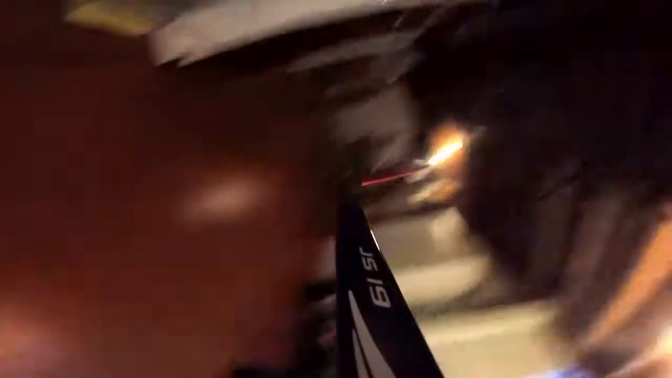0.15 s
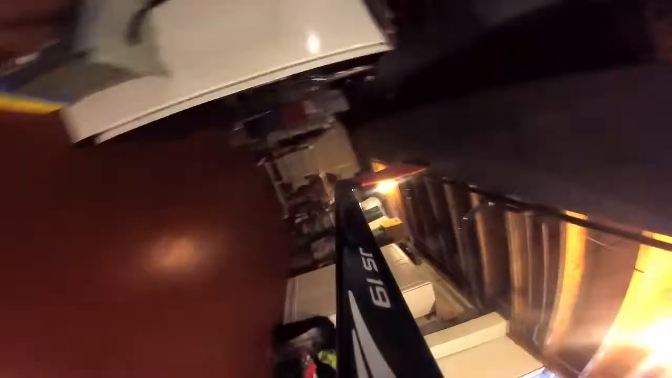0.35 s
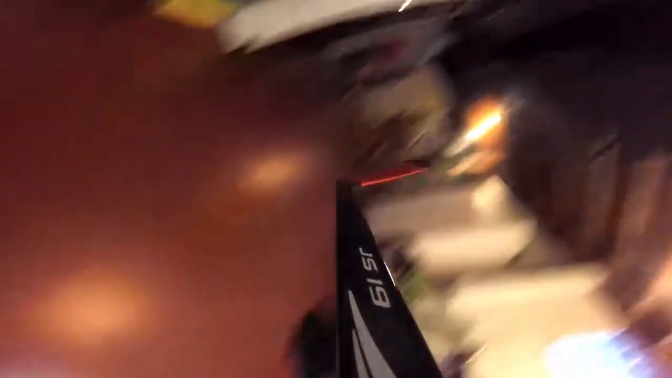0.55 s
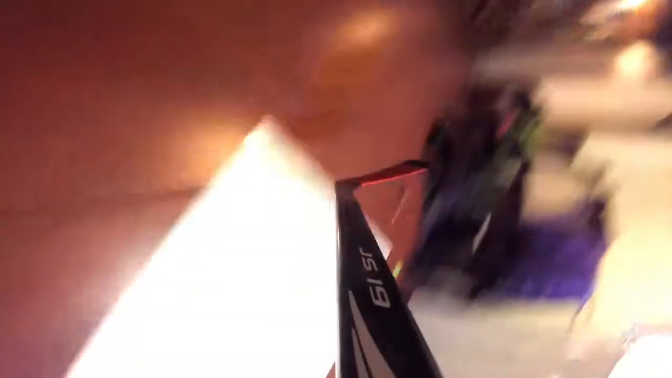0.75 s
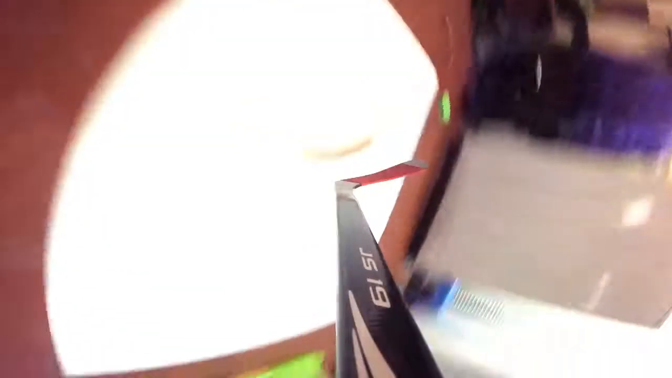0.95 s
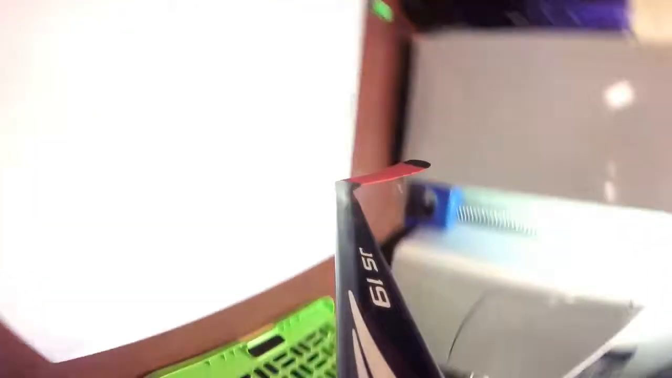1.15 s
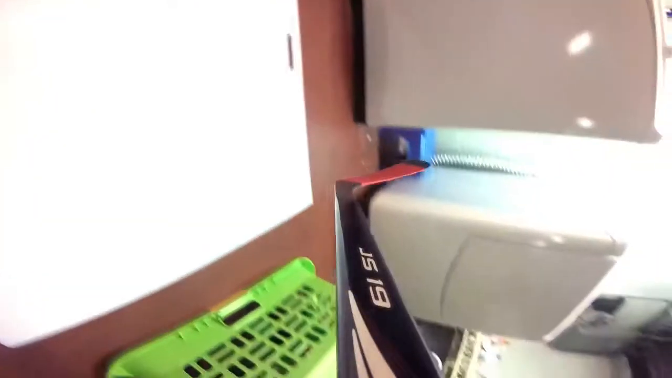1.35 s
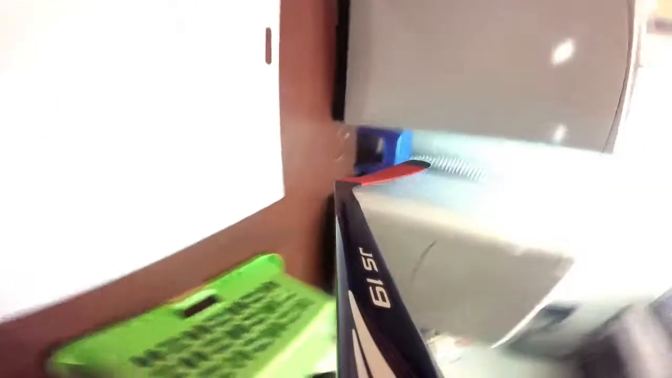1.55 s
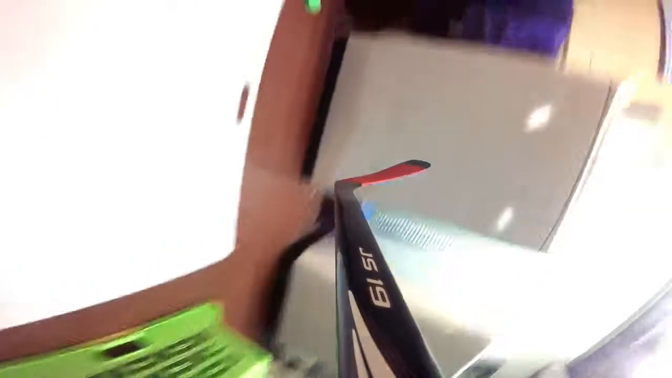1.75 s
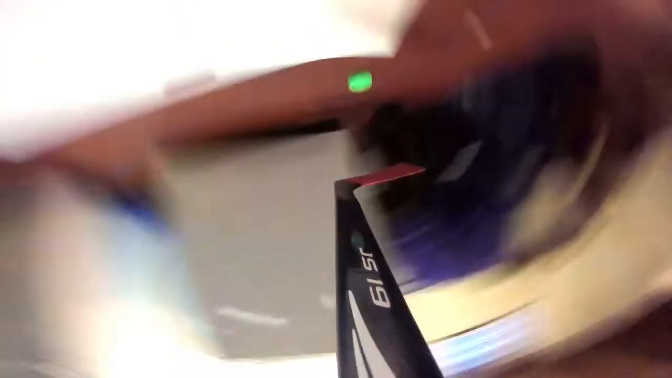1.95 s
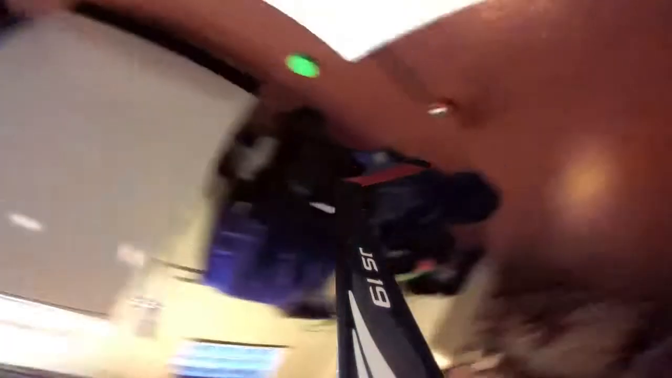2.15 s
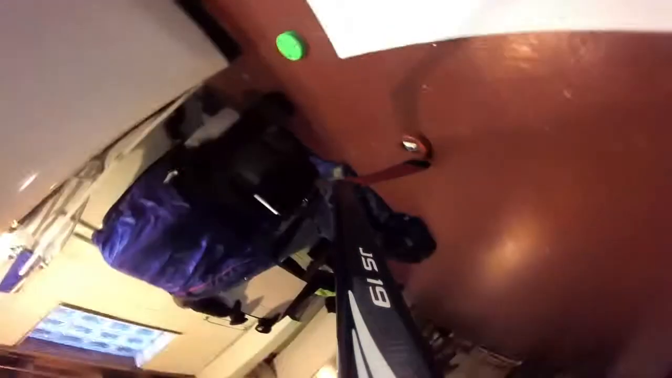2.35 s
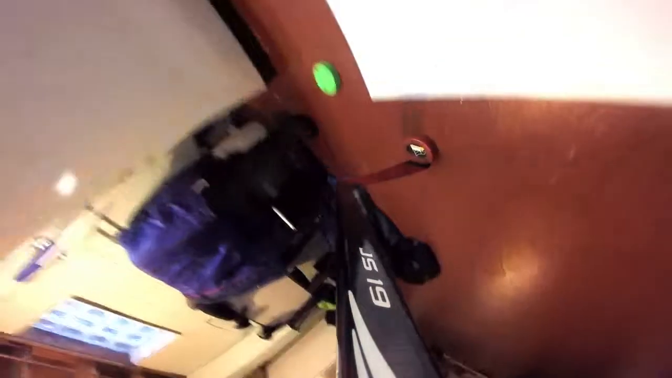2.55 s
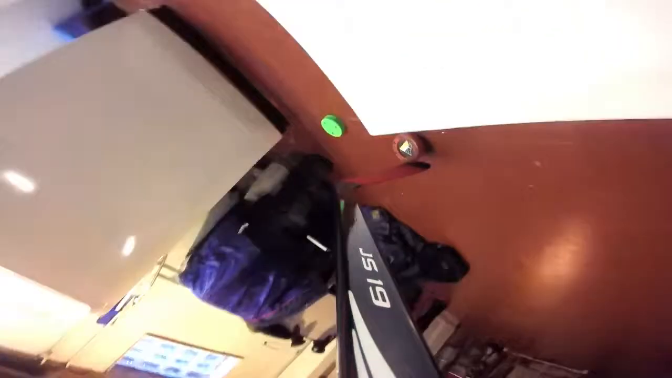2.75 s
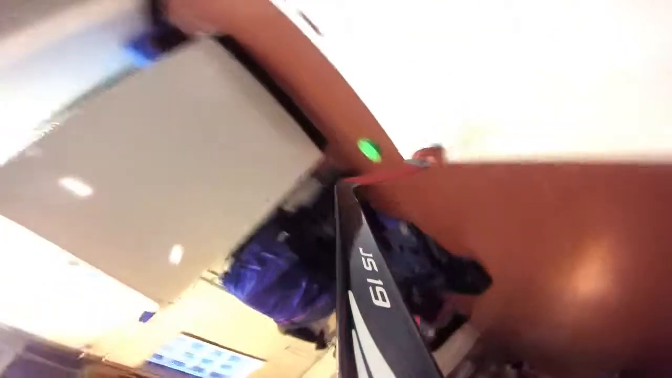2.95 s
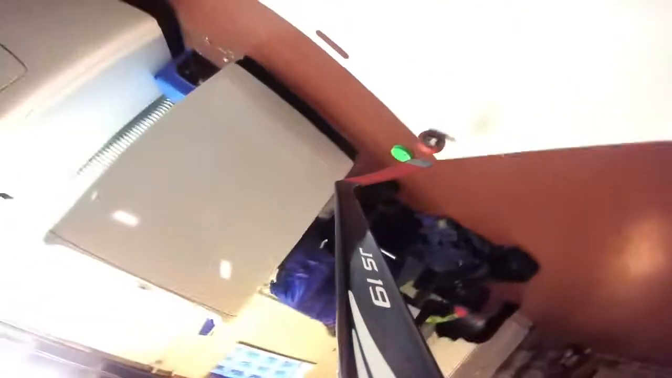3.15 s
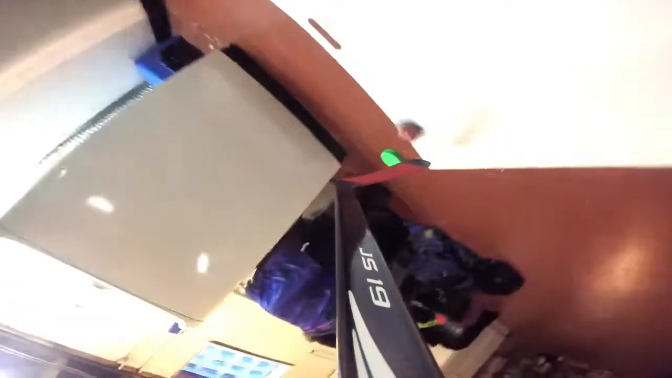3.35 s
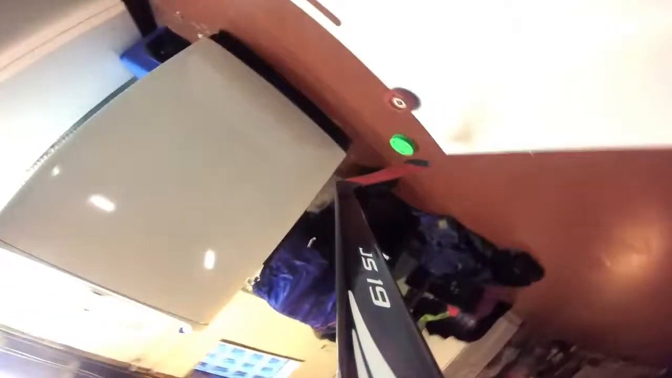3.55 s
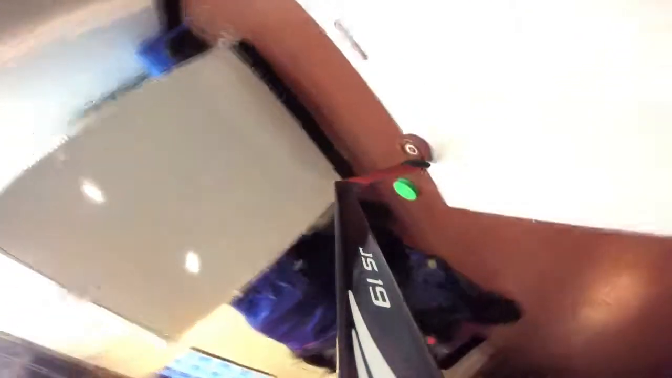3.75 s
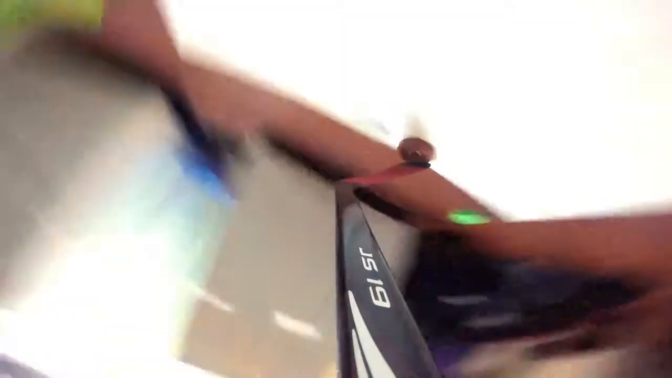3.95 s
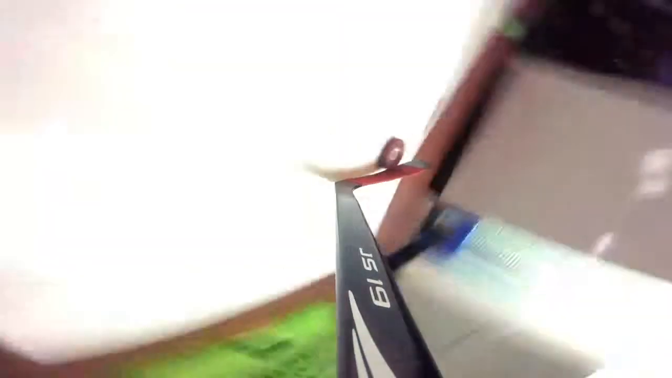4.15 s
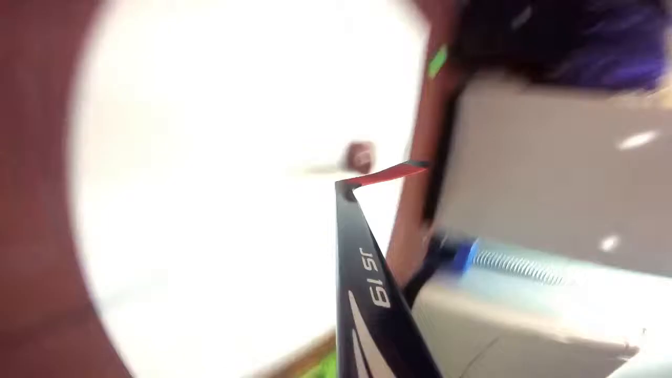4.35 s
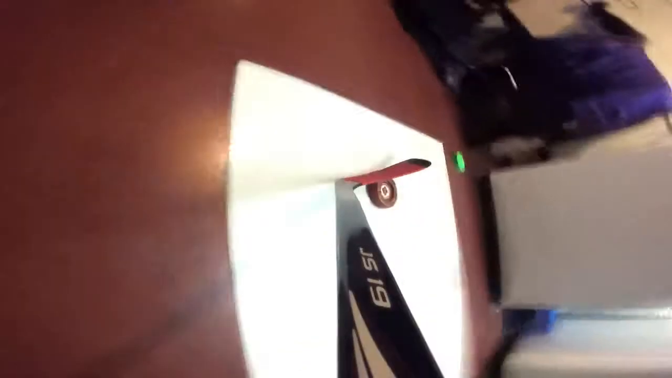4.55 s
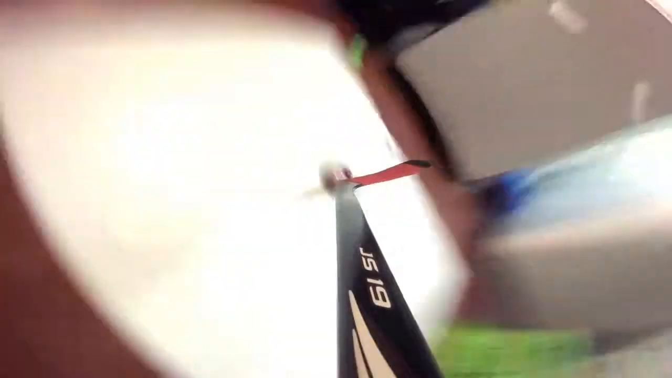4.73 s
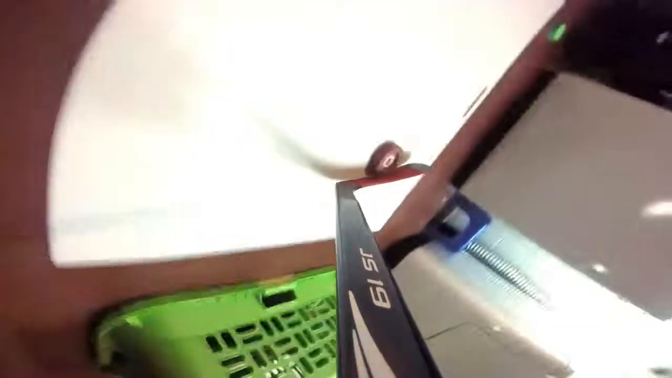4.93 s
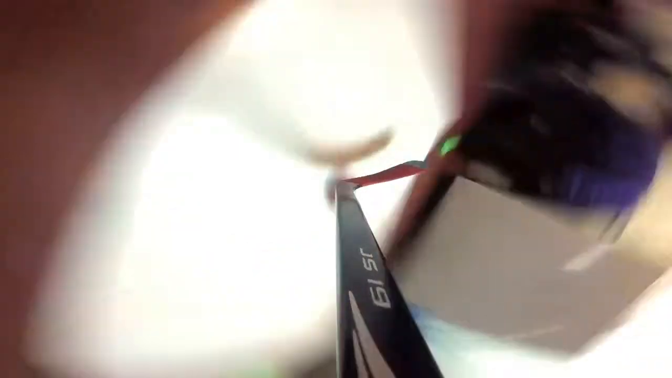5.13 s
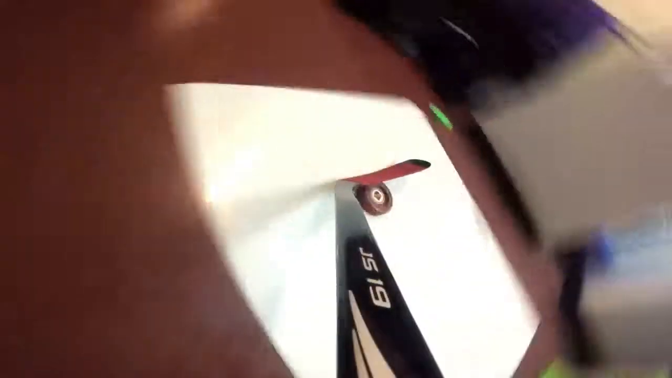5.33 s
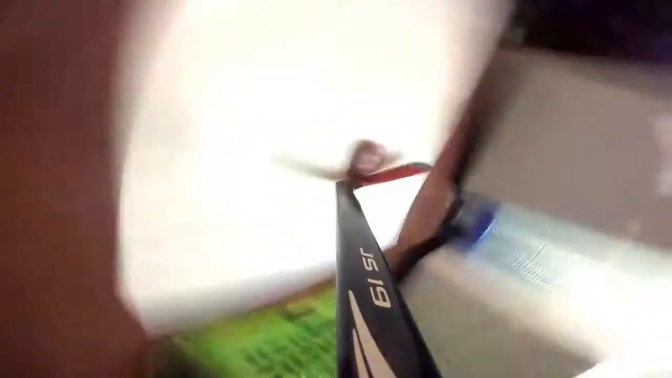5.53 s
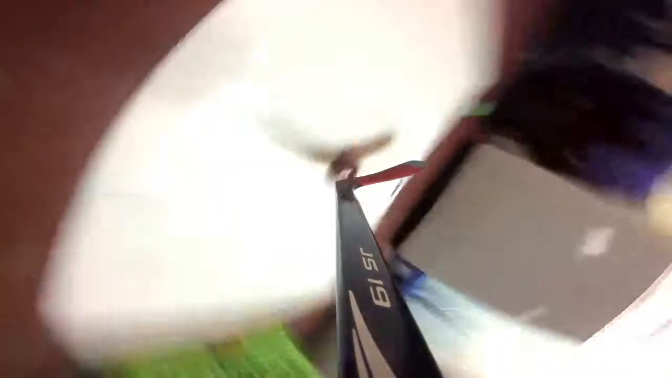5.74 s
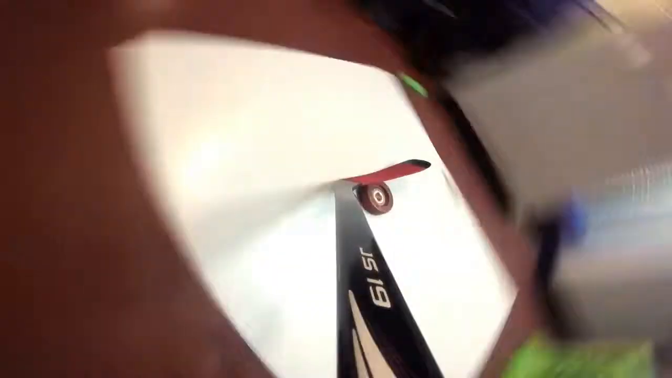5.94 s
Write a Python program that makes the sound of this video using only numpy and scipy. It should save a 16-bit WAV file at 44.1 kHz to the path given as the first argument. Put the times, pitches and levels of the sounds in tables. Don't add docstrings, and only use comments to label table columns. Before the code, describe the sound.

Heard through a microphone fixed to the shaft: swinging air, a sharp whack and rattling scrape, faint ball taps, then quick hollow clacks in runs.

```python
import sys
import numpy as np
from scipy import signal
from scipy.fft import rfft, irfft
from scipy.io import wavfile
from scipy.ndimage import uniform_filter1d

SR = 44100
rng = np.random.default_rng(int(sys.argv[2]) if len(sys.argv) > 2 else 0)


def how_loud(loudness_db):
    steps = np.asarray(loudness_db, float) / 20
    return 10 ** steps


def unload_audio(sound):
    columns = np.transpose(np.atleast_2d(sound))
    steps = np.round(np.clip(columns, -1, 1) * 32767)
    wavfile.write(sys.argv[1], SR, steps.astype(np.int16))


N = 268569
SPAN = 8192
STRIKE_SCATTER_DB, STRIKE_DETUNE = 2.0, 0.012
CHATTER_DB = 2.2


# (time [s], shaft peak [dB], blade modes re shaft [dB], crack re shaft [dB], loudest blade region [Hz])
HITS = [(0.001, -16.5, -12, -14, 2160), (0.008, -11.5, -12, -16.5, 1300), (2.349, -0.5, -4.5, -11.5, 1577),
        (2.42, -7.5, -6, -20, 1420), (3.751, -2.5, -2.5, -15.5, 3100), (3.768, -15, -5, -15.5, 3140),
        (3.786, -11.5, -9.5, -23, 3150), (3.837, -13.5, -10, -21, 2010), (4.089, -19, 8.5, -5, 1200),
        (4.098, -13, -1, -14.5, 1390), (4.137, -10.5, -5, -16, 1640), (4.162, 1, -5.5, -27.5, 1200),
        (4.171, -13, -9, -13.5, 1330), (4.536, 1, -3, -11.5, 2520), (4.554, -7, -7, -15, 1450),
        (4.56, -13, -8, -14.5, 1300), (4.872, -8, 6.5, -6.5, 2720), (4.882, -13.5, -10.5, -13, 3420),
        (4.927, 0.5, -7.5, -9, 1273), (5.227, -1.5, 0.5, -10.5, 2350), (5.304, 2.5, -10, -13, 1240),
        (5.537, -18.5, -6.5, -29, 1354), (5.564, -8, -10, -14, 1200), (5.568, -3, 3.5, -16.5, 2370),
        (5.87, -2, -0.5, -16, 1200), (5.926, 3, -11.5, -14.5, 1540)]
# (time [s], shaft peak [dB], blade modes re shaft [dB])
SETTLES = [(2.369, -20.5, -13), (2.395, -19, -12.5), (2.432, -14, -17), (4.152, -13, -8),
           (4.585, -22.5, -34), (4.888, -31.5, 0.5), (4.944, -15.5, -14), (5.315, -34.5, -13),
           (5.328, -30.5, -27), (5.583, -24.5, -11), (5.867, -18.5, -5.5), (5.878, -20, -12.5),
           (4.572, -26, -22.5), (5.238, -15.5, -9.5), (5.947, -29, -22.5)]
# (time [s], shaft peak [dB], blade modes re shaft [dB], crack re shaft [dB])
SKIPS = [(2.4718, -19, 2.5, -20), (2.4773, -12, -4, -25), (2.483, -13, -13, -26), (2.4864, -25, 0, -26),
         (2.4906, -15.5, 0.5, -12.5), (2.4929, -12.5, -3, -14), (2.4975, -7.5, -8, -17),
         (2.5027, -15, -15, -36), (2.5101, -19, -1, -27), (2.5145, -11, -20, -29),
         (2.5172, -15.5, 0.5, -25), (2.521, -15.5, -11, -26), (2.5249, -5.5, -10.5, -15),
         (2.5298, -8, -11, -20), (2.5363, -10, -1, -30), (2.5412, -21.5, 1, -24), (2.5466, -8.5, -6, -22),
         (2.5499, -14.5, -20, -20), (2.556, -18, -8, -20.5), (2.5598, -9.5, -18, -28),
         (2.5654, -16, -4, -26), (2.5714, -13, -4.5, -28), (2.5785, -16, 1, -25),
         (2.5845, -20.5, -6.5, -14.5), (2.5873, -17, 6.5, -25.5), (2.5911, -20, -2, -20),
         (2.5951, -16, -7, -17), (2.5994, -8.5, -20, -25.5), (2.6065, -13, -4, -21),
         (2.6109, -8.5, -7, -18), (2.6155, -31, -12, -19.5), (2.6192, -16, 4, -5.5),
         (2.6246, -7, -4.5, -18), (2.63, -5.5, -11.5, -32.5), (2.6369, -9, -13, -28),
         (2.6425, -9.5, -13, -19), (2.6449, -9.5, -18.5, -38), (2.6504, -14.5, -6, -11),
         (2.6551, -14.5, 3, -12.5), (2.6582, -13, -5.5, -31.5), (2.6617, -18, -7.5, -6),
         (2.6648, -8.5, -9, -25), (2.6736, -12.5, -17, -25), (2.677, -16.5, -8, -12.5),
         (2.6812, -5, -8.5, -17), (2.6852, -5.5, -5, -27), (2.6907, -22.5, -12, -24.5),
         (2.6949, -29.5, -19.5, -30)]
# (time [s], shaft peak [dB], blade modes re shaft [dB], crack re shaft [dB], favoured shaft mode [Hz])
TOUCHES = [(1.783, -44, -3.5, -6, 1010), (1.791, -46.5, -2, -10, 1020), (1.829, -40.5, 0, -14, 900),
           (1.836, -39, -1, -6, 900), (1.879, -39.5, -6, -14, 900), (1.891, -49, -8, -27, 900),
           (1.905, -47, -12, -25, 900), (1.921, -48, -4, -19, 1000), (1.94, -48, -6, -19, 960),
           (2.776, -56.5, -3, -17, 1010), (2.925, -63, -7, -10, 1015), (3.866, -41, 10, -16, 1010),
           (3.881, -41, 14, -4, 1000), (3.967, -42, -8, -20, 1010), (3.987, -56.5, 17, 23, 1010),
           (4.057, -30, 6.5, -9.5, 1010), (4.064, -40, 8, -13, 1010), (4.225, -54, 4.5, -16, 1010),
           (4.239, -37, -3.5, -30, 600), (4.33, -48, -2, -16, 1010), (4.342, -30, -12, -28, 1040),
           (4.351, -41, -9, -12.5, 1040), (4.454, -59, 5, 7, 1015), (4.692, -40.5, -9, -33, 990),
           (4.805, -51, -15, -25, 1015), (5.005, -46, -5, -8, 1050), (5.026, -55, 6, -2, 1010),
           (5.069, -46, -8.5, -31, 894), (5.442, -36, -11, -27.5, 994), (5.632, -36.5, -7.5, -15, 900),
           (6.023, -35, -10, -22.5, 970)]


def contacts():
    hits = [(*row, 1.98, None) for row in HITS]
    settles = [(s, db, blade_db, blade_db - 10.5, 1400, 1.5, None) for s, db, blade_db in SETTLES]
    # (Hz, lift dB)
    skips = [(*row, 1470, 1.22, (900, 4.5)) for row in SKIPS]
    touches = [(*row, 1850, 5, (hz, 17.5)) for *row, hz in TOUCHES]
    return hits + settles + skips + touches


# (frequency [Hz], level [dB], t60 [s])
SHAFT = [(588, -10.5, 0.023), (795, -7.5, 0.019), (863.2, 0.5, .011), (1043, -8, 0.024),
         (873, -24.5, 0.073), (600, -31.5, 0.087)]
# (frequency [Hz], level [dB], t60 [s])
BLADE = [(1224, 4, 0.0065), (1443, 3.5, 0.0062), (1692, -2, 0.011), (1963, -2, 0.011), (2291, -3.5, 0.0083),
         (2642, -3.5, 0.0084), (3050, -2.5, 0.005), (3473, -7.5, 0.0065), (2190, -30.5, 0.076),
         (3060, -35.5, 0.054), (2810, -36.5, 0.054), (3520, -34.5, .07), (2010, -26.5, 0.028)]
# (frequency [Hz], level [dB], t60 [s])
CRACK = [(3154, 7, 0.0049), (4162, -0.5, 0.0054), (4856, -2.5, 0.0056), (5530, -10, 0.0058),
         (6183, -12.5, 0.023), (6640, -7, 0.0042), (8100, -17, 0.00096), (8460, -9.5, 0.0041),
         (9400, -19.5, 0.0017), (13000, -30.5, .002)]


def blows():
    out = np.zeros(N)
    t = np.arange(SPAN // 8) / SR
    for s, shaft_db, blade_db, crack_db, focus_hz, contact_ms, favoured in contacts():
        span = contact_ms / 1000
        onset = 1 - np.exp(-t / (0.0006 - 0.00003 * shaft_db))
        force = chatter(len(t), CHATTER_DB) * onset * np.exp(-(t / span) ** 2)
        ring_room = SPAN // 8 if favoured else 3 * SPAN // 8
        load = np.pad(uniform_filter1d(np.abs(force), size=9), (0, ring_room))
        top_hz = np.clip(9000 * how_loud(0.18 * shaft_db + 4), 3000, 18000)
        twist_db = np.clip(blade_db + 5.5, -8, 7)
        lean = favoured or (SHAFT[0][0], twist_db)

        shaft = band(driven(SHAFT, load, *lean), 390, 6000)
        blade = band(driven(BLADE, load, focus_hz, 7.8), 800, 11000)
        crack_body = ring(CRACK, STRIKE_SCATTER_DB, STRIKE_DETUNE, size=SPAN // 8)
        crack = band(signal.fftconvolve(force, crack_body), 1300, top_hz)
        thud = band(load, 150, 910)
        thud_db = 1.2 * shaft_db + 0.74 * twist_db - (24 if favoured else 19)
        add(out, s + 0.0006, shaft, shaft_db - 0.7)
        add(out, s + 0.0003, blade, shaft_db + blade_db + 5.5)
        add(out, s + 0.0003, crack, shaft_db + crack_db + 10.5)
        add(out, s + 0.0027, thud, thud_db)
    return out


# (start time [s], end time [s], shaft level at start [dB], at end [dB], treble re shaft [dB])
DRAGS = [(1.813, 1.88, -59, -58, -5), (1.877, 2.026, -53, -65, -5.5), (2.381, 2.433, -37, -23, -18),
         (2.468, 2.58, -28, -23.5, -16), (2.586, 2.697, -22.5, -26, -12.5), (3.788, 3.838, -63, -59, 8.5),
         (3.84, 3.877, -42, -41, -11.5), (3.983, 4.07, -48, -50, 4.5), (4.223, 4.297, -61.5, -65, 3),
         (4.078, 4.135, -48.5, -38, -2), (4.548, 4.601, -39.5, -63, -2.5),
         (4.887, 4.919, -40.5, -50.5, -5.5), (4.975, 5.036, -63, -56.5, 1.5),
         (5.252, 5.297, -46, -51.5, -3.5), (4.328, 4.357, -56, -50, -7), (4.626, 4.732, -60, -55, -14),
         (5.541, 5.561, -31, -50.5, -6), (5.585, 5.631, -62, -55.5, -4.5), (5.884, 5.927, -41.5, -50, -7.5)]


def drags():
    t = np.arange(N) / SR
    gains = np.zeros((3, N))
    for start, end, db0, db1, treble_db in DRAGS:
        gain = (t >= start) * (t < end) * how_loud(np.interp(t, [start, end], [db0, db1]))
        gains += gain * how_loud(np.array([[0], [0.44 * treble_db - 0.5], [treble_db]]))
    force = unit(chatter(N, CHATTER_DB) * how_loud(5.7 * walk(250)))
    shaft = band(ring(SHAFT, 0, 0), 640, 5000)
    blade = band(ring(BLADE, 0, 0), 990, 5700)
    crack = band(ring(CRACK, 0, 0), 1800, 14000)
    out = np.zeros(N)
    for gain, body in zip(gains, (shaft, blade, crack)):
        out += signal.fftconvolve(force * gain, body / np.linalg.norm(body))[:N]
    return out


# (time [s], peak [dB], pitch [Hz], t60 [s])
FLEXES = [(1.881, -38, 107, 0.083), (2.352, -28.5, 122, 0.12), (2.43, -43.5, 106, .12),
          (2.499, -36, 110, 0.12), (2.56, -37, 109.4, .15), (2.63, -39.5, 111, 0.16),
          (2.69, -38.5, 110, 0.092), (3.755, -19.5, 111.5, 0.095), (4.03, -44.5, 99.1, 0.57),
          (4.099, -20.5, 111.6, 0.16), (4.14, -18.5, 106.3, 0.066), (4.163, -34.5, 94.6, 0.075),
          (4.314, -41.5, 108, 0.18), (4.535, -27.5, 96.2, 0.11), (4.873, -34.5, 133.4, 0.13),
          (4.928, -37.5, 122, 0.062), (5.226, -36.5, 92.3, 0.2), (5.538, -25.5, 101.4, 0.047),
          (5.57, -30, 97.8, 0.069), (5.866, -27, 103, 0.11)]
# (time [s], peak [dB], pitch [Hz], swell [ms])
GRIPS = [(2.456, -47, 179, 30), (2.714, -45.5, 184, 25), (3.949, -45, 162, 10), (4.619, -69.5, 211, 33),
         (4.741, -60, 180, 35), (4.842, -43.5, 206, 83), (4.907, -38, 207, 38), (5.359, -72, 160, 19),
         (5.441, -39, 177, 20), (5.648, -55, 161.7, 30), (5.717, -46, 183, 28), (5.989, -50.5, 155.6, 38)]


def grips():
    out = np.zeros(N)
    t = np.arange(SPAN) / SR
    for s, db, hz, t60 in FLEXES:
        swell = 1 - np.exp(-t / 0.017)
        add(out, s, swell * decay(t, t60) * np.sin(2 * np.pi * hz * t), db)
    for s, db, hz, swell_ms in GRIPS:
        x = t * 1000 / swell_ms
        add(out, s, x * np.exp(-x * x) * np.sin(2 * np.pi * (hz * t + rng.random())), db)
    return out


# (time [s], peak [dB], pitch [Hz], treble re peak [dB], diffuse share [dB])
KNOCKS = [(0.921, -27, 1950, -15, 24), (1.225, -42, 2720, -18, 5), (1.134, -36, 516, -40, 13),
          (3.003, -47, 1336, -33, 5), (3.388, -23, 558, -13.5, -16.5), (3.395, -19, 1400, -17.5, -4),
          (3.499, -15, 1790, -8.5, -10), (3.542, -35, 560, -25, -9.5), (3.55, -23.5, 1860, -21, -23),
          (3.569, -34, 420, -20, -14), (3.57, -26, 1850, -20.5, -21), (3.58, -29, 1670, -20, -16.5),
          (3.597, -34, 1750, -16, -12), (3.6, -36, 423, -24.5, -9.5), (3.626, -24, 1850, -26, -18),
          (4.43, -18, 1280, -29, -13.5)]
# (frequency [Hz], width [Hz], level [dB])
HOUSING = [(336, 180, -8), (600, 324, -4.5), (1200, 480, -3.5), (1930, 510, -1.5), (2700, 440, -9),
           (3430, 1000, -15.5)]


def knocks():
    out = np.zeros(N)
    t = np.arange(2 * SPAN) / SR
    noise = rng.standard_normal((2, N)) * how_loud(3 * walk(200))
    tones = np.array([unit(band(noise[0], f - w / 2, f + w / 2)) for f, w, _ in HOUSING])
    for s, db, hz, treble_db, diffuse_db in KNOCKS:
        here = slice(int(s * SR), int(s * SR) + len(t))
        rise_s = 0.0023 + 0.0022 * how_loud(max(diffuse_db, 0) / 2)
        echo = how_loud(diffuse_db) * (1 - np.exp(-t / rise_s)) * decay(t, 0.27)
        gains = [how_loud(d - 27 * max(np.log2(f / (1.4 * hz)), 0)) for f, _, d in HOUSING]
        body = unit(np.dot(gains, tones[:, here]))
        swing = (1 - np.exp(-t / 0.0006)) * np.exp(-t / 0.003)
        tick = swing * (1.96 * np.sin(2 * np.pi * hz * t) + 0.86 * body)
        treble = (swing + echo) * np.exp(-t / 0.11) * noise[1, here]
        add(out, s, tick + echo * body, db - 3.5)
        add(out, s, band(treble, 2600, 6700), db + treble_db - 0.5)
    return out


# (time [s], buffet level [dB])
STREAM = [(0.0, -45), (.17, -43.5), (.23, -96), (.44, -53.5), (.55, -37.5), (.72, -35.5), (.85, -40.5),
          (1.02, -58), (1.6, -62), (1.94, -54), (2.3, -62), (2.8, -69.5), (3.2, -77), (3.45, -69),
          (4.5, -61.5), (4.75, -49.5), (5.15, -63.5), (6.09, -53)]
# (time [s], buffet level [dB], half width [s])
PUFFS = [(2.4, -48.5, 0.031), (2.56, -50, 0.033), (2.699, -43.5, 0.044), (4.101, -52.5, 0.058),
         (4.625, -45.5, 0.024), (5.004, -41.5, 0.025), (5.385, -45, 0.025), (5.64, -40.5, 0.022),
         (6.0, -41.5, .025)]
# (frequency [Hz], level [dB per Hz])
WIND = [(15, -26.5), (25, -2), (97, -7.5), (146, -7), (430, -19.5), (605, -21), (1060, -44.5),
        (1500, -37.5), (1950, -65), (3300, -120)]
# (depth [dB], rate [per s])
FLICKER = [(4., 18), (2.5, 30), (1.2, 40), (.8, 50)]


def wind_buffet():
    t = np.arange(N) / SR
    out = flickering(coloured(WIND, 15, 90), *FLICKER[0]) * how_loud(np.interp(t, *np.transpose(STREAM)))
    for s, db, half in PUFFS:
        out += how_loud(db) * np.exp(-((t - s) / half) ** 2) * np.sin(2 * np.pi * 41 * (t - s))
    return out


# (peak time [s], level [dB], rise [s], fall [s])
SWINGS = [
    (0.0, -43, .05, 0.14),
    (0.631, -37.5, 0.068, .1),
]
# (time [s], level [dB])
GAIN = [(0.0, 12), (.17, -4.5), (.25, -18), (.5, -16.5), (.7, -6), (.87, -3.5), (.96, 9), (1.12, 2),
        (1.6, -2), (1.94, 7), (2.15, 0.5), (2.7, 3.5), (2.8, -13), (3.0, -20.5), (3.3, -11.5), (3.57, 11.5),
        (3.7, -1), (6.09, -2.5)]
# (frequency [Hz], level [dB per Hz])
ROOM = [(120, -28.5), (200, -4.5), (273, -5.5), (340, -1.5), (456, -9), (590, -3), (806, -8), (883, -8),
        (1100, -10), (1530, -9), (2050, -11), (2420, -16.5), (12600, -38.5), (14900, -45), (16000, -65.5)]
REST_DB = [-62, -63, -64.5]
GAIN_SHARE = [0.57, 0.75, 0.77]
SWING_DB = [-1, -21, -21]
AFTER_DB = [-42.5, -44, -60.5]


def hum_room_hiss():
    t = np.arange(N) / SR
    layers = [coloured(WIND, 90, 2000), coloured(ROOM, 300, 2700), coloured(ROOM, 2700, 16000)]
    gain = how_loud(np.interp(t, *np.transpose(GAIN)))
    swing, after, out = np.zeros(N), np.zeros(N), np.zeros(N)
    for s, db, rise, fall in SWINGS:
        swing += how_loud(db) * np.exp(-((t - s) / np.where(t < s, rise, fall)) ** 2)
    for s, db, *_ in HITS:
        after += how_loud(db) * (t > s) * np.exp(-np.abs(t - s) / 0.038)
    rows = zip(layers, FLICKER[1:], REST_DB, GAIN_SHARE, SWING_DB, AFTER_DB)
    for layer, flicker, rest_db, share, swing_db, after_db in rows:
        level = how_loud(rest_db) * gain ** share + how_loud(swing_db) * swing + how_loud(after_db) * after
        out += flickering(layer, *flicker) * level
    return out


# (time [s], frequency [Hz], level [dB], t60 [s])
MOUNT_RING = (0.0, 1840, -59.5, 0.9)


def background():
    t = np.arange(N) / SR
    out = wind_buffet() + hum_room_hiss()
    for s, db, *_ in HITS:
        if db > -10:
            out[(t > s - 0.014) & (t < s)] *= how_loud(-10)
    start, hz, db, t60 = MOUNT_RING
    return out + how_loud(db + 2.5) * np.sin(2 * np.pi * hz * t) * decay(t - start, t60)


def unit(x):
    return x / np.sqrt(np.mean(x ** 2))


def band(x, lo_hz, hi_hz, order=2):
    return signal.lfilter(*signal.butter(order, [lo_hz, hi_hz], "band", fs=SR), x)


def decay(t, t60):
    return np.exp(-np.log(1000) * t / t60)


def add(out, s, x, db):
    i = max(int(s * SR), 0)
    out[i:i + len(x)] += (x * how_loud(db) / np.max(np.abs(x)))[:N - i]


def walk(rate):
    k = int(SR / rate)
    steps = np.repeat(rng.standard_normal(N // k + 1), k)
    return 0.95 * uniform_filter1d(uniform_filter1d(steps, k), k)[:N]


def flickering(x, depth_db, rate):
    return unit(x * how_loud(depth_db * walk(rate)))


def chatter(size, spread_db):
    return rng.standard_normal(size) * how_loud(spread_db * rng.exponential(size=size))


def ring(modes, scatter_db, detune, size=SPAN // 2):
    hz, db, t60 = np.transpose(modes)[:, :, None]
    luck = rng.standard_normal((3, len(modes), 1))
    t = np.arange(size) / SR
    tones = np.sin(2 * np.pi * hz * (1 + detune * luck[0]) * t) * decay(t, np.maximum(t60, 1e-3))
    return np.sum(np.sign(luck[1]) * how_loud(db + scatter_db * luck[2]) * tones, axis=0)


def driven(modes, load, focus_hz, focus_db):
    t = np.arange(len(load)) / SR
    out = np.zeros(len(load))
    for (hz, db, t60), luck in zip(modes, rng.standard_normal((len(modes), 3))):
        swing = signal.lfilter([1], [1, -decay(1 / SR, max(t60, 1e-3))], load)
        near_db = focus_db * np.exp(-(np.log(hz / focus_hz) / 0.13) ** 2)
        turn = 2 * np.pi * (hz * (1 + STRIKE_DETUNE * luck[0]) * t + luck[1])
        out += how_loud(db + near_db + STRIKE_SCATTER_DB * luck[2]) * swing * np.sin(turn)
    return out


def coloured(table, lo_hz, hi_hz):
    hz, db = np.transpose(table)
    f = np.maximum(np.arange(N // 2 + 1) * SR / N, 1)
    edges = ((1 + (lo_hz / f) ** 4) * (1 + (f / hi_hz) ** 4)) ** -0.5
    shape = how_loud(np.interp(np.log(f), np.log(hz), db)) * edges
    return irfft(rfft(rng.standard_normal(N)) * shape, N)


def scene():
    stick = blows() + drags()
    t = np.arange(SPAN) / SR
    tail = band(rng.standard_normal(SPAN), 600, 6100, order=1) * decay(t, 0.032)
    wet = signal.fftconvolve(stick, tail / np.linalg.norm(tail))[:N]
    return (stick + how_loud(-13.5) * wet + grips() + knocks() + background())[None]


def top_cut(x):
    return signal.sosfilt(signal.butter(12, 16450, fs=SR, output="sos"), x)


def record(dry):
    clipped = np.clip(dry, -1.02, 1.02)
    low_pass = signal.ellip(4, 0.5, 40, 15000, fs=SR, output="sos")
    return top_cut(signal.sosfilt(low_pass, clipped))


dry = scene()
out = record(dry)
unload_audio(out)
```